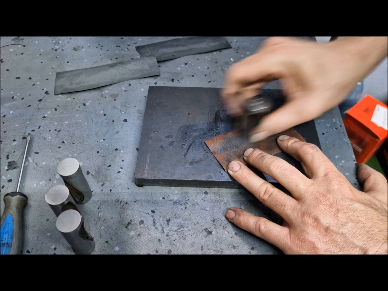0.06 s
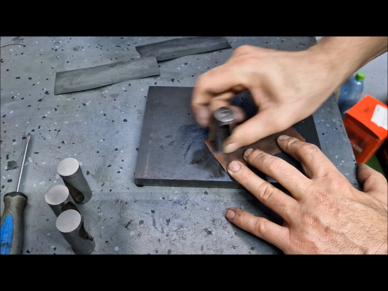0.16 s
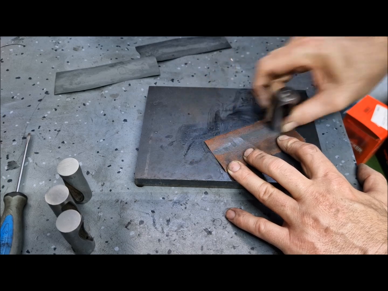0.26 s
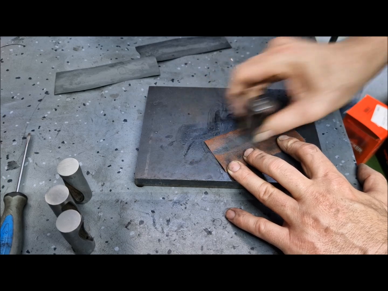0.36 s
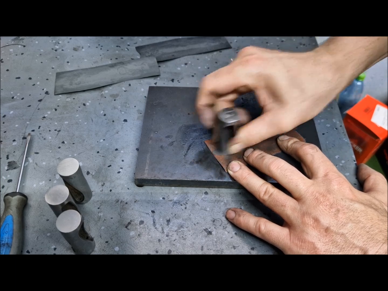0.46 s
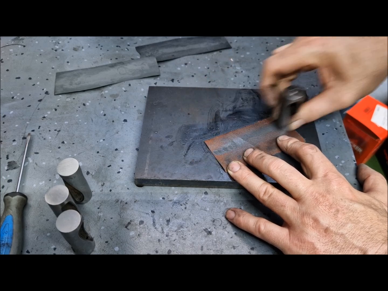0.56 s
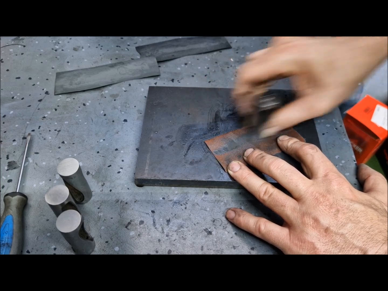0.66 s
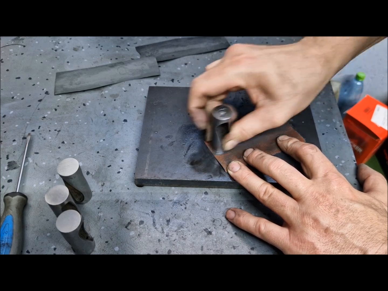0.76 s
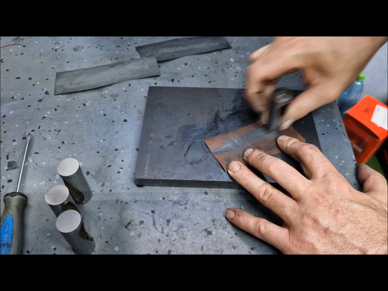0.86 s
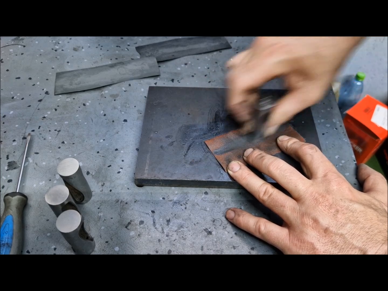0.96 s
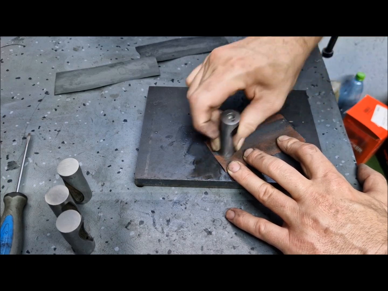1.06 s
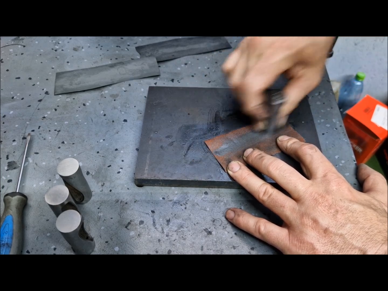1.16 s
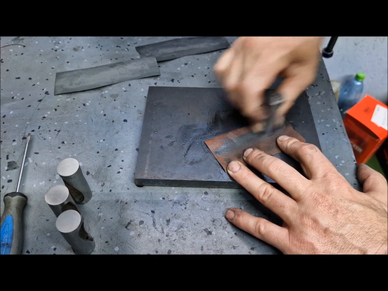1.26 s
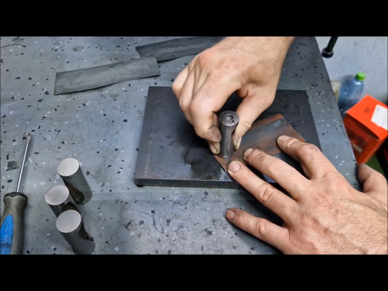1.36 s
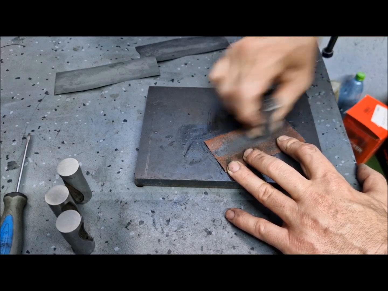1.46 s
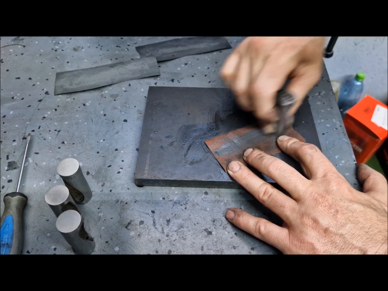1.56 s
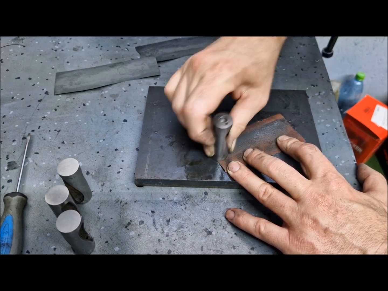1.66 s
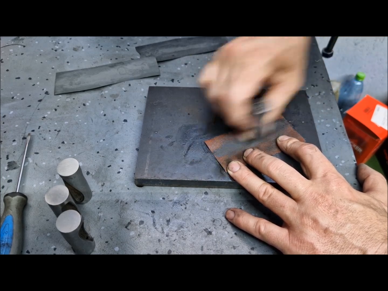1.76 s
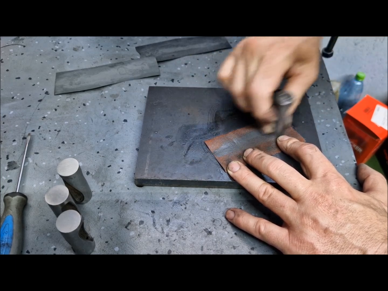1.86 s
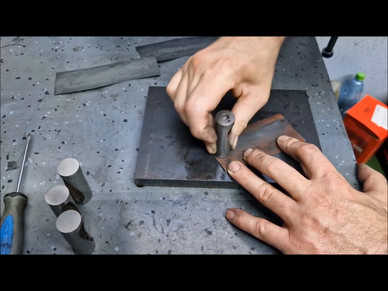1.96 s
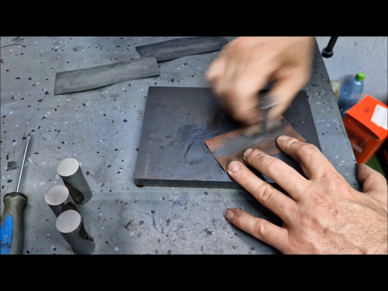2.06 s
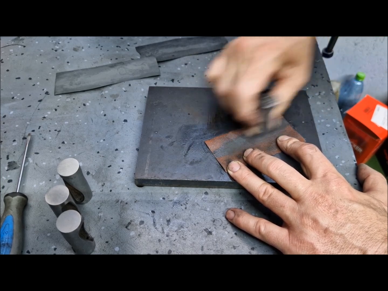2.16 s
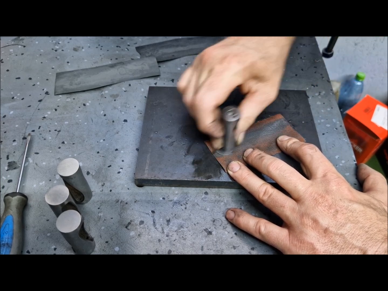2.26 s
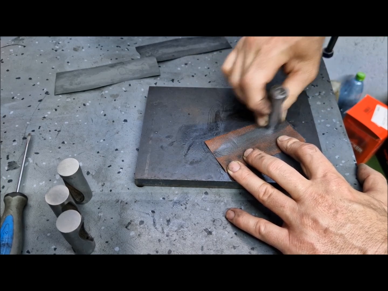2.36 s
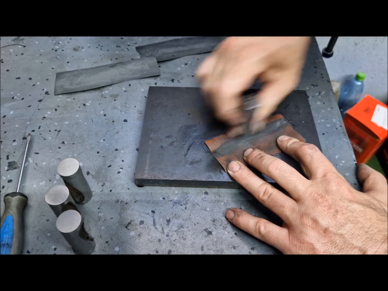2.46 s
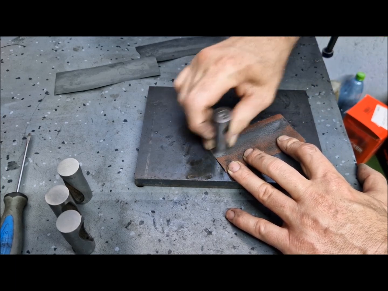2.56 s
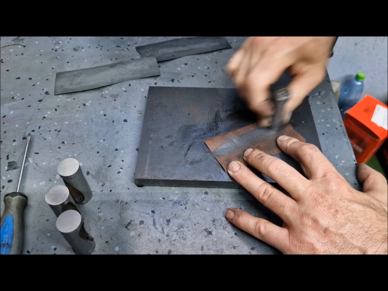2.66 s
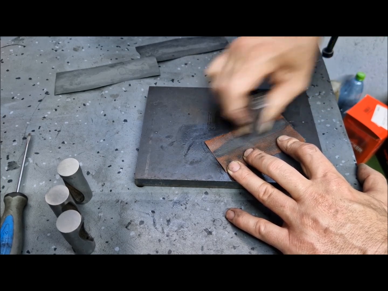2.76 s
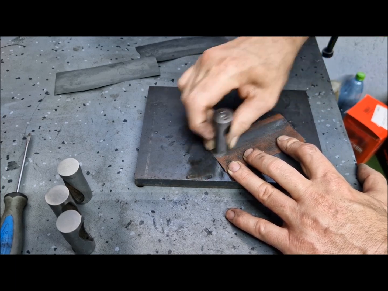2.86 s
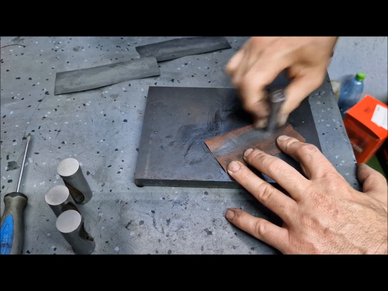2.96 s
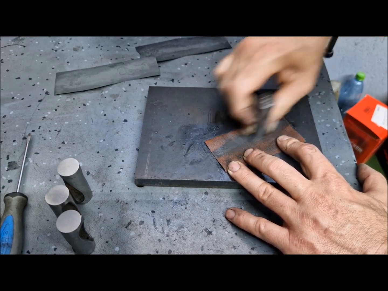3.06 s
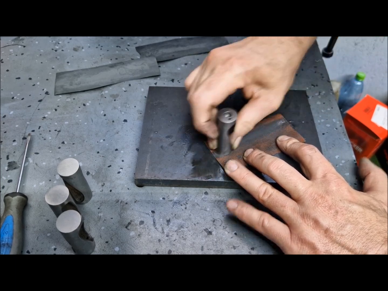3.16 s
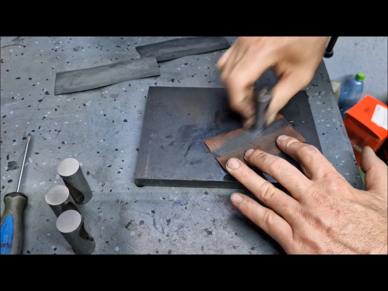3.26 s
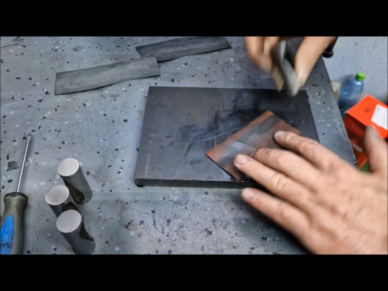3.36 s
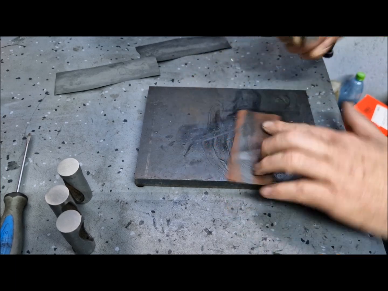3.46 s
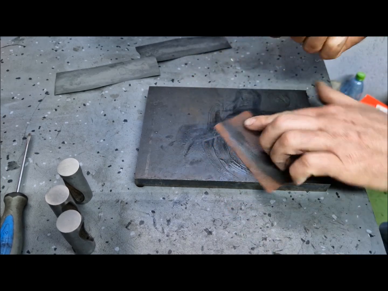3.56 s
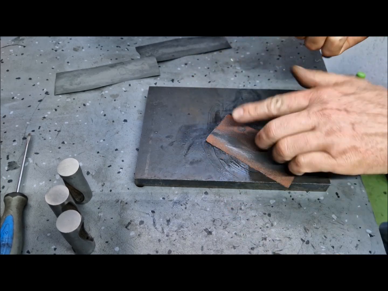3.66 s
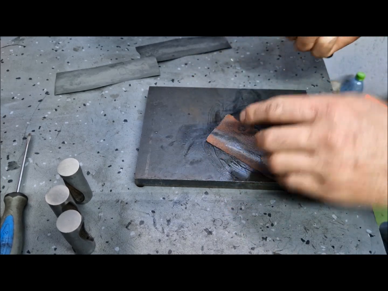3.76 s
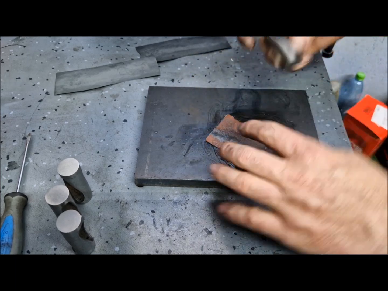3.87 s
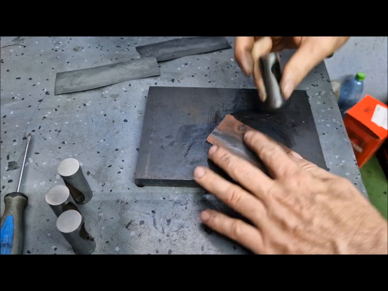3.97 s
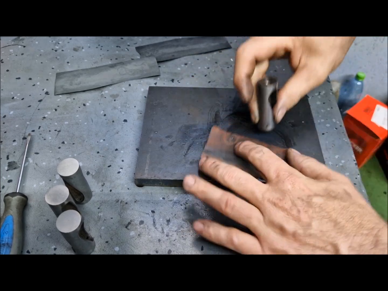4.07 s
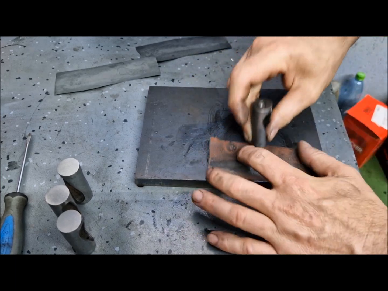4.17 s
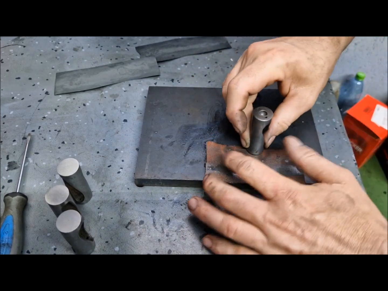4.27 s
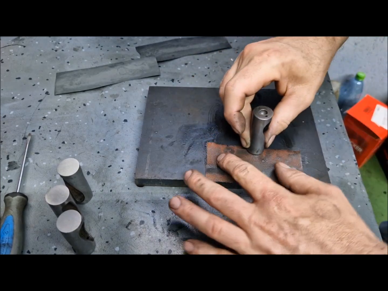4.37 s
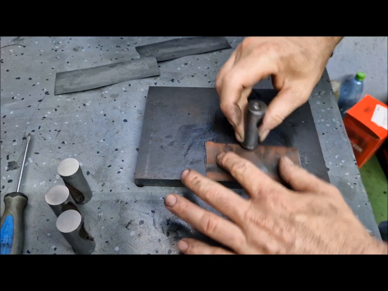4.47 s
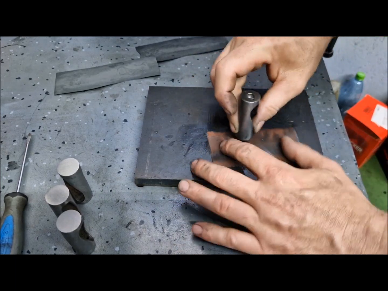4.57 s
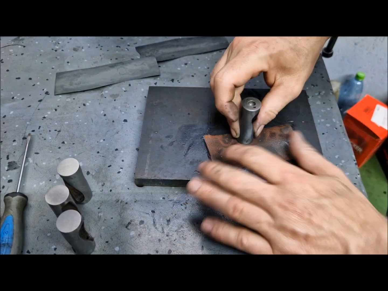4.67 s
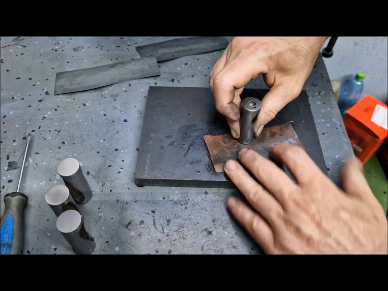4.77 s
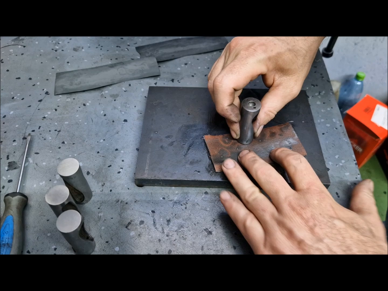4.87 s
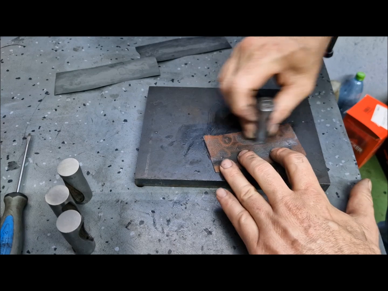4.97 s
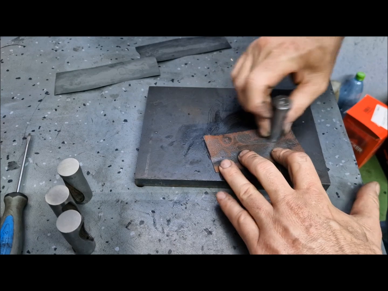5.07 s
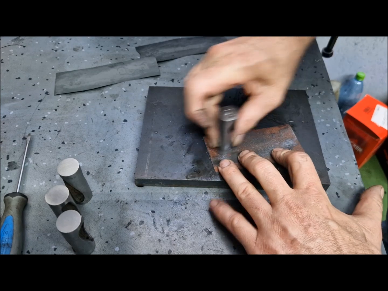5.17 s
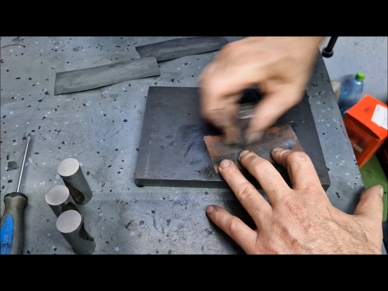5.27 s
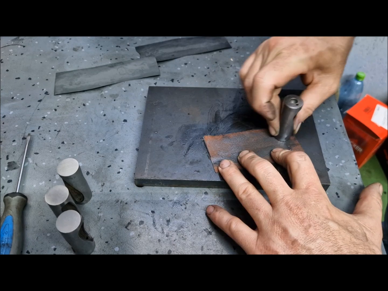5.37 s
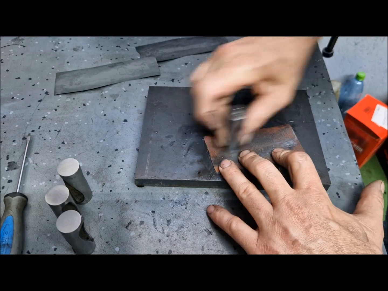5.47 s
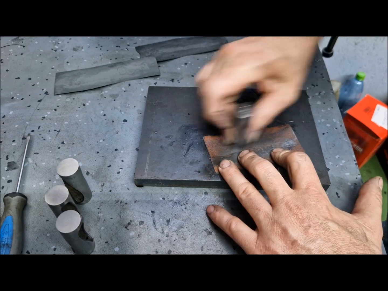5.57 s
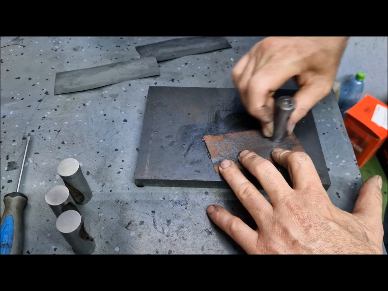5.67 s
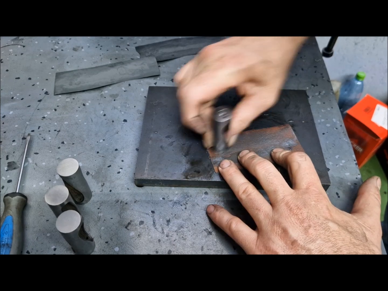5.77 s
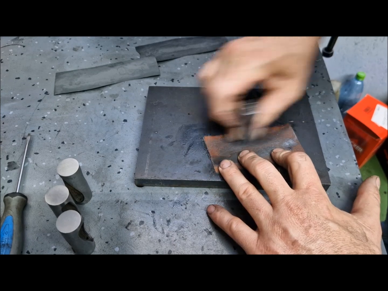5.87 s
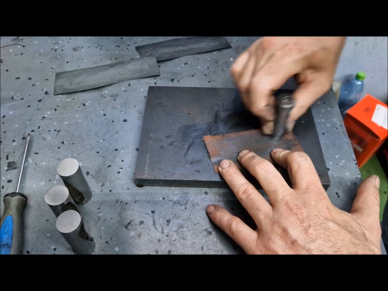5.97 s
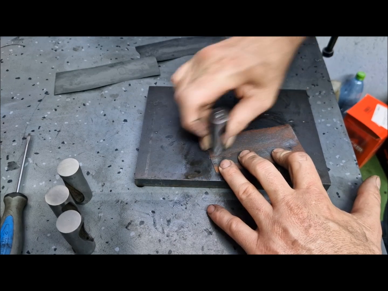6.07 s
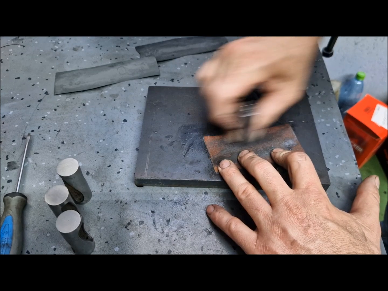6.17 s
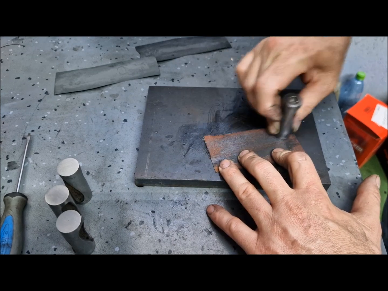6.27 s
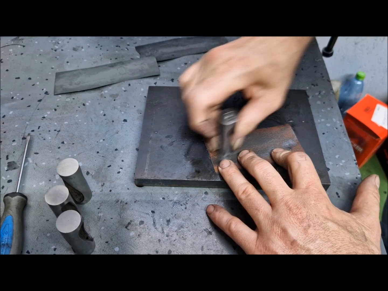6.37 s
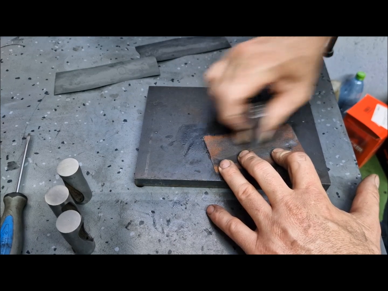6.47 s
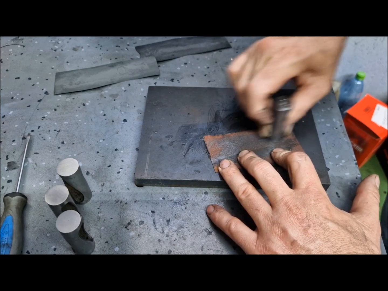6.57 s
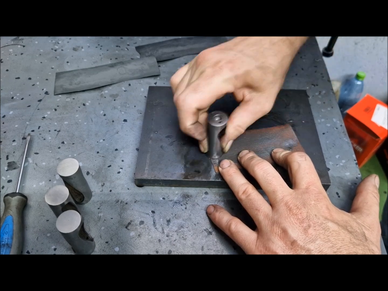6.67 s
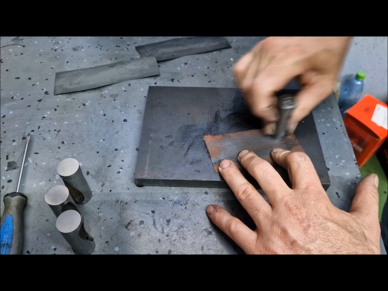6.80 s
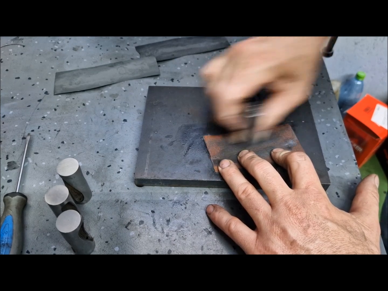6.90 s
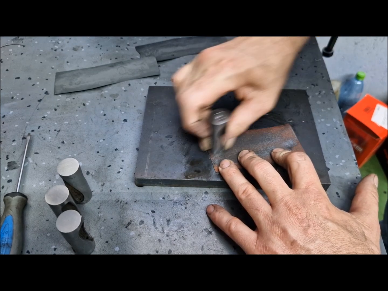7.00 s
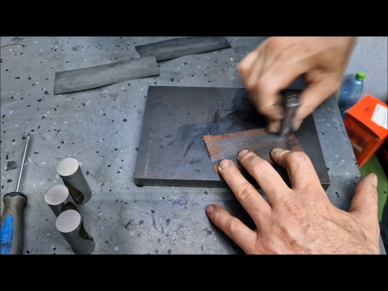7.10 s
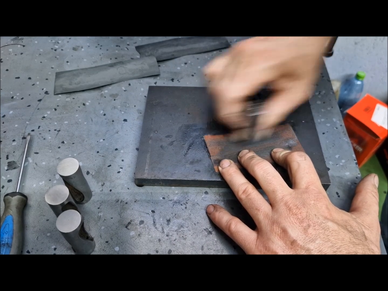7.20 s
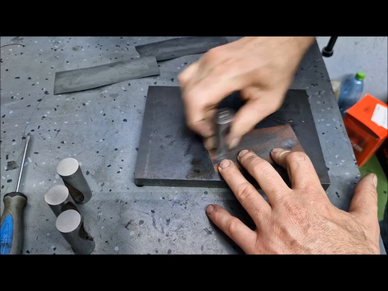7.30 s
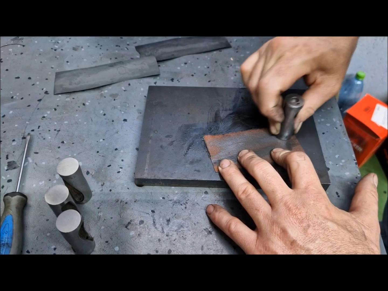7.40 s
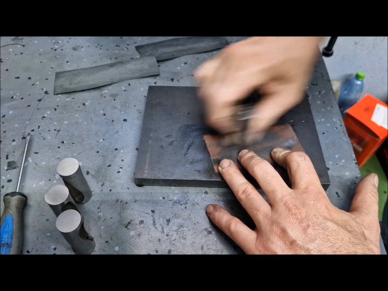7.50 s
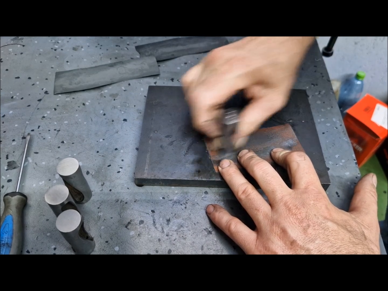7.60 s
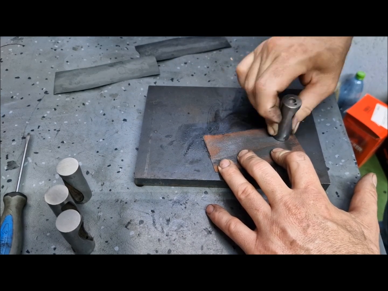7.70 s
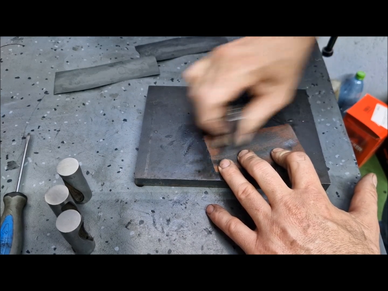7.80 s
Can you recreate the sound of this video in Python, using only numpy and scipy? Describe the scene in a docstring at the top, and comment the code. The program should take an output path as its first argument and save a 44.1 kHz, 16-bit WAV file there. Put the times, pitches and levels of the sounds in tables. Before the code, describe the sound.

Close stereo view of hand lapping at a workshop bench: a steel engine part rasps on sandpaper in six or seven bright, hissing strokes a second, with short squeaky chirps and soft low bumps at turns. Midway it stops, the paper slides and crackles, a sharp clink and a duller knock ring the steel plate, then similar, less squeaky rubbing resumes. Short room echo, low faint drone.

```python
"""Hand lapping: a steel engine part is rubbed on sandpaper over a steel plate, six or seven strokes a second.
Dense noise grains hiss and rasp with hand speed; friction noise drives ringing steel modes and the bench.
Turns nudge the bench; chirped stick-slip bursts are the edge catching, strongest in the first spell.
Midway the paper slides to a fresh spot (shaped noise), the part is set down with a clink, the plate knocks
(noise clacks and ringing modes), and lapping goes on. A short echo and a low room drone surround it all."""
import sys
import numpy as np
from scipy import signal
from scipy.fft import rfft, irfft, next_fast_len
from scipy.io import wavfile
from scipy.ndimage import uniform_filter1d, map_coordinates

SR = 44100
rng = np.random.default_rng(int(sys.argv[2]) if len(sys.argv) > 2 else 0)


def master(y):
    """Save y as 16-bit WAV."""
    cut = np.clip(np.atleast_2d(y).T, -1, 1)
    pcm = np.round(cut * 32767)  # scale
    wavfile.write(sys.argv[1], SR, pcm.astype(np.int16))


N = 345744
TIME = np.arange(N) / SR  # s
SIZE = next_fast_len(N + SR, True)  # FFT length, samples
FREQ = np.maximum(np.arange(SIZE // 2 + 1) * SR / SIZE, 1)  # Hz


def undb(db):
    """Decibels to gain."""
    return 10 ** (np.asarray(db) / 20)


def unit(x):
    """Scale to rms 1."""
    return x / np.sqrt(np.mean(x ** 2))


def contour(points):
    """Join (Hz, value) points on a log-frequency axis."""
    hz, value = np.transpose(points)
    return np.interp(np.log(FREQ), np.log(hz), value)


def colour(x, points):
    """Causal minimum-phase filter with the given spectrum, built by folding the cepstrum."""
    cepstrum = irfft(np.log(undb(contour(points))), SIZE)
    cepstrum[1:SIZE // 2] *= 2
    cepstrum[SIZE // 2 + 1:] = 0
    response = np.exp(rfft(cepstrum))
    return irfft(rfft(x, SIZE) * response, SIZE)[..., :N]


# left-right correlation: [freq_hz, correlation]
LIKENESS_BY_HZ = [(60, 0.94), (300, 0.88), (700, 0.14), (1300, 0), (2200, 0.44), (5500, 0.43), (7500, 0),
                  (10000, -.1), (15000, -.1)]


def spread(pair, left_db):
    """Two unrelated signals become left and right, alike in the bass."""
    alike = np.clip(contour(LIKENESS_BY_HZ), -.99, .99)
    weights = np.sqrt([1 + alike, 1 - alike])
    mid, side = irfft(rfft(pair, SIZE) * weights, SIZE)[:, :N]
    return np.array([mid + side, mid - side]) * undb([[left_db / 2], [-left_db / 2]])


def walk(rate):
    """Random wander of rms 1: straight lines between `rate` random knots a second."""
    knots = rng.standard_normal(N // 20)
    return unit(np.interp(TIME * rate, np.arange(len(knots)), knots))


def band(x, hz, width_hz):
    """One broad resonance."""
    b, a = signal.iirpeak(hz, hz / width_hz, SR)
    return signal.lfilter(b, a, x)


def soften(x, hz):
    """A softer, longer contact loses the treble: second-order low-pass."""
    return signal.sosfilt(signal.butter(2, hz, fs=SR, output="sos"), x)


def fade(t60):
    """One second of exponential decay, 60 dB down after t60 seconds."""
    return undb(-60 * TIME[:SR] / t60)


def ring(modes, phase_spread):
    """Sum of decaying sine modes; each reaches the two ears with its own phase (spread in rad)."""
    ears = np.array([[1], [-1]])
    out = np.zeros((2, SR))
    for k, (hz, db, t60) in enumerate(modes):
        phase = 2 * np.pi * hz * TIME[:SR] + phase_spread * (-1) ** k * ears / 2
        out += undb(db) * fade(t60) * np.sin(phase)
    return out


def through(x, response):
    """Convolve a signal with an impulse response: a force with a ringing body, a sound with an echo."""
    return signal.fftconvolve(np.atleast_2d(x), response, axes=1)[:, :N]


def add(out, s, sound):
    """Mix a sound in at time s."""
    start = min(max(int(s * SR), 0), N)
    out[:, start:start + sound.shape[1]] += sound[:, :N - start]


def grit(size_db, clump_db, clump_rate):
    """Dense micro-impacts of uneven size, bunched as the grains grip and let go."""
    level_db = size_db * rng.standard_normal(N) + clump_db * walk(clump_rate)
    return unit(rng.standard_normal((2, N)) * undb(level_db))


# two spells of lapping, even tempo between points; odd strokes pull, even push: [start_s, stroke_number]
LAPPING_SPELLS = [
    [(-.125, 1), (.471, 5), (1.08, 9), (1.71, 13), (2.453, 18), (3.214, 23), (3.385, 24)],
    [(4.938, 1), (5.42, 4), (5.852, 7), (6.309, 10), (6.736, 13), (7.182, 16), (7.91, 21)],
]


def turns():
    """Start time, length and number of every stroke."""
    rows = []
    for spell in LAPPING_SPELLS:
        s, number = np.transpose(spell)
        numbers = np.arange(number[0], number[-1] + 1)
        starts = np.interp(numbers, number, s)
        rows += zip(starts, np.diff(starts), numbers)
    return rows


# how the hand bears on the part, levels relative: [time_s, hiss_db, rasp_re_hiss_db, ring_re_hiss_db,
# drag_db, bench_press_db, top_speed_share (moment of top speed, 0-1 of a mean stroke)]
HAND_GRIP = [(0.3, -37, -2, -11.5, -53, -49.5, .5), (1.55, -37.5, -2, -16.5, -54, -55, 0.51),
             (2.2, -37.5, -2.1, -16.5, -49.5, -49.5, .48), (3.3, -39, -1.7, -11.5, -51.5, -52.5, 0.49),
             (5.02, -41, -2.5, -21, -59, -69, 0.53), (5.18, -38, -2.5, -12.5, -54.5, -67, 0.52),
             (5.34, -38, -4.5, -13.5, -53.5, -56.5, 0.53), (6.1, -37, -4.5, -17, -50, -48, 0.51),
             (7.75, -38.5, -4.2, -16.5, -51.5, -48, 0.54)]
# a push rasps more and peaks later than the mean stroke, a pull less and earlier by as much
PUSH_RASP_DB, PUSH_LATE_SHARE, STROKE_SCATTER_DB = 0.4, 0.025, .5


def hand():
    """Speed (zero at every turn), contact, and the levels of the running stroke."""
    s, *columns = np.transpose(HAND_GRIP)
    hiss_db, rasp_db, ring_db, drag_db, press_db, top = (np.interp(TIME, s, c) for c in columns)
    speed, contact, way, force = np.zeros((4, N))
    for start, length, number in turns():
        now = slice(*np.searchsorted(TIME, [start, start + length]))
        contact[now] = 1
        way[now] = (-1) ** number  # push +1, pull -1
        force[now] = rng.standard_normal()
        peak = np.clip(top[now.start] + PUSH_LATE_SHARE * (-1) ** number, .1, .9)
        progress = (TIME[now] - start) / length
        speed[now] = np.sin(np.pi * np.interp(progress, [0, peak, 1], [0, .5, 1]))
    contact, way, force = uniform_filter1d([contact, way, force], SR // 30)
    hiss_db = hiss_db + STROKE_SCATTER_DB * force
    rasp_db = rasp_db + PUSH_RASP_DB * way
    return speed, contact.clip(0), hiss_db, rasp_db, ring_db, drag_db, press_db


def patchy(x, depth_db, rate, count):
    """The contact patch keeps shifting, so each stretch of the spectrum swells and fades on its own."""
    edges_hz = np.geomspace(350, 16000, count)
    spectrum = rfft(x, SIZE)
    out = np.zeros((2, N))
    for row in np.eye(count):
        share = np.interp(FREQ, edges_hz, row)
        out += irfft(spectrum * share, SIZE)[:, :N] * undb(depth_db * walk(rate))
    return unit(out)


def off_the_hand(x, share, lag_s, sway):
    """A reflection from the moving hand combs the sound with notches that wander."""
    late = []
    for ear in x:
        lag = lag_s * np.exp(sway * walk(9))
        late.append(map_coordinates(ear, [(TIME - lag) * SR], order=3))
    return (x + share * np.array(late)) / np.hypot(1, share)


# relative spectra of grit hiss, edge rasp and drag on the backing: [freq_hz, level_db]
HISS_SPECTRUM = [(700, -46.5), (1600, -21.5), (2200, -13), (2800, -11), (3800, -7.5), (4400, -9),
                 (6000, -8.5), (8300, 1), (10500, 2.5), (13000, 3.5), (16000, 1.5)]
RASP_SPECTRUM = [(1000, -56), (3000, -18.5), (3700, -14), (4400, -11.5), (4850, -2.5), (5150, -6),
                 (5550, 0), (6300, -4), (7000, -6.5), (7400, -1.5), (8300, -23.5), (14000, -33)]
SCUFF_SPECTRUM = [(300, -16), (540, 3.5), (700, -9), (1000, -4.5), (1100, -15), (1420, 4.5), (1600, -12),
                  (2050, 9), (2600, 0), (4000, -16)]
# modes of the steel plate before hand damping, also rung by the knocks: [freq_hz, level_db, t60_s]
PLATE_MODES = [(1715, -26, .15), (1943, -22, .65), (1967, -11, .22), (1994, -13, .15), (2150, -24, .14),
               (3517, -27, .2), (3876, -7.5, .17), (3957, -13, .13), (4026, -1.5, .12), (4080, -20, .24)]


def lapping(speed, contact, hiss_db, rasp_db, ring_db, drag_db):
    """Faster sliding cuts more grains and sounds brighter; grit friction also rings the steel."""
    # the hand loops a little, so it never quite stops
    pace = (speed + 0.23 * contact) * undb(.5 * walk(45))

    cut = colour(spread(grit(size_db=-0.5, clump_db=1.2, clump_rate=700), left_db=.8), HISS_SPECTRUM)
    cut = patchy(cut, depth_db=1.5, rate=40, count=12)
    bright = pace ** 1.67 * cut
    dull = 2.6 * (contact - speed) * pace ** 2.35 * soften(cut, hz=3500)
    hiss = undb(hiss_db + 5.0) * (bright + dull)

    scrape = spread(grit(size_db=5.5, clump_db=2, clump_rate=300), left_db=-0.9)
    scrape = unit(colour(scrape, RASP_SPECTRUM))
    rasp = undb(hiss_db + rasp_db + 2.3 * walk(60)) * pace ** 2.25 * scrape

    # the flat face drags on the paper's backing with a dull, patchy scuff
    drag = colour(spread(grit(size_db=2, clump_db=1.5, clump_rate=53), left_db=0.5), SCUFF_SPECTRUM)
    drag = patchy(drag, depth_db=4, rate=25, count=12)
    scuff = undb(drag_db - 4.5) * pace ** 0.76 * drag
    rubbing = off_the_hand(hiss + rasp + scuff, share=.45, lag_s=.0009, sway=.35)

    # the gripping hand damps the steel
    steel = ring(PLATE_MODES, phase_spread=.9) * fade(t60=.16)
    steel = steel / np.sqrt(np.sum(steel[0] ** 2))
    friction = soften(grit(size_db=2.5, clump_db=3.5, clump_rate=91)[0], hz=2270)
    force = undb(hiss_db + ring_db) * pace ** .5 * friction
    ringing = undb(2.5) * through(force, steel)

    # slow sliding near the turns makes it sing in short, rough spurts
    spurts = spread(grit(size_db=3, clump_db=5, clump_rate=30), left_db=0)
    spurts = unit(band(spurts, hz=4060, width_hz=110))
    sing = undb(hiss_db - 15.5) * pace ** .5 * (contact - 0.47 * speed) * spurts
    return rubbing + sing + ringing


# turns nudge the bench, the part rocks once a stroke; levels relative, Hz are medians
TURN_DB, TURN_HZ, ROCK_DB, ROCK_HZ = -14.5, 89.6, -22.5, 270
BUMP_SCATTER_DB, BUMP_SCATTER_OCTAVES = 2.5, .35


def nudges():
    """Soft thud as the hand reverses, lighter bump as the part rocks: (start_s, level_db, centre_hz)."""
    rows = []
    for start, length, number in turns():
        if number <= 2:  # the first strokes of a spell are too light to shake the bench
            continue
        turn = (start, TURN_DB, TURN_HZ)
        rock = (start + length * rng.uniform(), ROCK_DB, ROCK_HZ)
        for s, db, hz in (turn, rock):
            size, pitch = rng.standard_normal(2)
            rows.append((s, db + BUMP_SCATTER_DB * size, hz * 2 ** (BUMP_SCATTER_OCTAVES * pitch)))
    return rows


# relative spectrum of the friction-shaken bench: [freq_hz, level_db]
RUMBLE_SPECTRUM = [(15, -23.5), (30, -8.5), (56, 5.5), (100, -6.5), (128, -6), (170, -11), (225, -10),
                   (250, -2.5), (300, -17.5), (350, -26.5), (420, -18), (480, -33), (700, -27.5),
                   (1300, -60.5)]
# modes of the bench: [freq_hz, level_db, t60_s]
BENCH_MODES = [(54.4, -7.5, 0.7), (84, -0.5, 0.13), (132.2, -2, 0.17), (199, -3.5, .12), (250, -12.5, 0.24),
               (321.4, -5.5, 0.091), (360, -8.5, 0.09), (531, -13, .12), (723, -12.5, 0.28)]
# harder bumps on the bench, levels relative: [start_s, level_db, centre_hz]
BENCH_THUDS = [(3.339, -12, 250), (4.235, 1, 332), (4.378, -11.5, 142), (4.694, -0.5, 92), (4.695, 2, 326),
               (5.245, -10, 152), (5.82, 0.5, 122), (6.13, -10.5, 132), (6.995, -8, 109)]


def bench(speed, contact, press_db):
    """Friction shakes the bench all through a stroke; shoves and knocks ring its low modes."""
    shake = spread(grit(size_db=2.5, clump_db=3.5, clump_rate=55), left_db=1.2)
    shake = unit(colour(shake, RUMBLE_SPECTRUM))
    out = undb(press_db - 0.5) * shake * (contact + 0.034 * speed)
    body = ring(BENCH_MODES, phase_spread=.25) * undb([[.8], [-.8]])
    for s, db, hz in BENCH_THUDS + nudges():
        thud = soften(band(body, hz, width_hz=hz * 0.66), 2 * hz)
        add(out, s, undb(db - 27.0) * thud)
    return out


# relative spectrum of the room's drone: [freq_hz, level_db]
ROOM_SPECTRUM = [(12, -35), (25, -2), (54, -5.5), (110, -13), (170, -20.5), (270, -22.5), (400, -35.5),
                 (800, -40), (2800, -46), (6000, -41), (16000, -51)]


def workshop(dry):
    """A short diffuse echo, poor in bass and treble, and the low drone of the room."""
    echo = rng.standard_normal((2, SR)) * fade(t60=0.3) * (TIME[:SR] > .004)
    echo = band(echo / np.sqrt(np.sum(echo[0] ** 2)), hz=2070, width_hz=17000)
    echo = soften(echo, hz=7500)
    echo = signal.sosfilt(signal.butter(1, 250, "high", fs=SR, output="sos"), echo)
    drone = unit(colour(spread(rng.standard_normal((2, N)), left_db=3.5), ROOM_SPECTRUM))
    drone = drone * undb(0.84 * walk(4.2))
    return dry + undb(-8.5) * through(dry, echo) + undb(-59.5) * drone


# a coarse grain snags the edge lightly; level relative
SNAG_DB, SNAG_SCATTER_DB, SNAG_HZ, SNAG_S = -32.5, 1.5, 5610, 0.0027


def snags():
    """Light catches, one at a chance moment of each push: (centre_s, level_db, pitch_hz, length_s)."""
    rows = []
    for start, length, number in turns():
        if number % 2 == 0:
            s = start + length * rng.uniform(1 / 5, 2 / 3)
            db = SNAG_DB + SNAG_SCATTER_DB * rng.standard_normal()
            rows.append((s, db, SNAG_HZ, SNAG_S))
    return rows


# the edge catches on the grit and chatters, levels relative, pitch at mid-chirp, length a mean decay scale:
# [centre_s, level_db, pitch_hz, length_s]
EDGE_CATCHES = [(0.085, -37, 5770, 0.01), (0.389, -24.5, 5590, 0.0089), (0.699, -23, 5600, 0.0067),
                (0.985, -31, 5080, 0.0068), (1.314, -22, 5650, 0.0046), (1.624, -24, 5710, 0.0081),
                (1.921, -26, 5390, 0.0056), (2.211, -28.5, 5280, 0.0065), (2.234, -19.5, 5024, 0.0044),
                (2.516, -20, 5600, 0.0028), (2.793, -29, 5660, 0.0036), (2.824, -20.5, 5480, 0.0016),
                (3.131, -21.5, 5570, 0.0046), (3.34, -29, 5460, 0.0064)]


def catches():
    """A short run of stick-slip jerks; the pitch shoots up as the edge breaks free."""
    out = np.zeros((2, N))
    t = TIME[:SR // 10] - 1 / 20
    for s, db, hz, length in EDGE_CATCHES + snags():
        jerks = unit(soften(rng.standard_normal((3, len(t))), hz=730))
        side_s = length * np.where(t < 0, .8, 1.2)  # rises faster than it falls
        swell = np.exp(-np.abs(t / side_s) ** 0.79)
        phase = 2 * np.pi * np.cumsum(hz * (1 + .1 * np.tanh(t / 0.00592))) / SR
        chatter = swell * ((0.51 + 0.75 * jerks[0]) * np.sin(phase) + 0.4 * jerks[1:] * np.cos(phase))
        # the skid sweeps from one to two times the pitch
        phase = 2 * np.pi * np.cumsum(hz * (1.5 + .5 * np.tanh((t - .004) / 0.00392))) / SR
        rough = unit(soften(rng.standard_normal((2, len(t))), hz=1500))
        skid = rough * np.sin(phase) * np.exp(-((t - .006) / 0.0041) ** 2)
        add(out, s - 1 / 20, undb(db + 1.5) * (chatter + undb(-5.5) * skid))
    return out


# a slide starts and stops quickly, swells, holds or dips slightly midway, and the sheet settles afterwards
SLIDE_EDGE_S, SETTLE_DB, SETTLE_DB_PER_S = 0.0086, -18, 170


def sliding(start, length, db, middle_db):
    """Gain of one slide: quick edges, a swell, hold or slight dip midway, then a faint settling tail."""
    outside_s = np.maximum(start - TIME, TIME - start - length).clip(0, 1)
    progress = np.clip((TIME - start) / length, 0, 1)
    shape = undb(middle_db * (np.sin(np.pi * progress) - 1))
    settle = (TIME > start + length) * undb(SETTLE_DB - SETTLE_DB_PER_S * outside_s)
    return undb(db) * shape * (np.exp(-outside_s / SLIDE_EDGE_S) + settle)


# relative spectrum of paper sliding on the plate: [freq_hz, level_db]
PAPER_SPECTRUM = [(200, -17), (600, -21), (1050, -18), (1480, -11), (1900, -11), (2500, -12.5), (3600, -5),
                  (5500, -1), (8000, -2), (12000, 1), (15500, 2.5)]
# paper slides over the plate, levels relative: [start_s, length_s, level_db, middle_re_ends_db]
PAPER_SLIDES = [(3.383, .1, -50.5, -1), (3.484, .13, -39.5, 5), (3.613, 0.095, -45.5, 0),
                (4.057, 0.18, -49, 5), (4.26, .075, -59, 3), (4.39, 0.054, -57, 2), (4.471, 0.22, -43.5, 7)]
# paper and fingertips swish: [centre_s, level_db, centre_hz, length_s]
FINGER_SWISHES = [(4.096, -43.5, 5460, 0.034), (4.18, -66, 1300, .03), (4.479, -46, 5760, 0.019),
                  (4.538, -59, 1380, 0.057), (5.03, -60, 1270, .03), (5.229, -49, 1990, 0.023)]
# paper crackles under the fingers, levels relative: [start_s, level_db, centre_hz]
PAPER_CRACKLES = [(3.356, -37.5, 1410), (4.019, -46.5, 3050), (4.052, -45.5, 5450), (4.387, -43, 6100),
                  (4.409, -42, 4340), (4.690, -35.5, 5200), (4.8, -47, 7000), (4.812, -40, 5400),
                  (4.911, -52, 11100), (4.955, -41, 8250)]


def paper():
    """The sheet's back slides on the plate, duller as it slows; it swishes and crackles under the fingers."""
    gain = np.max([sliding(*slide) for slide in PAPER_SLIDES], axis=0)
    rub = colour(spread(grit(size_db=0, clump_db=1.1, clump_rate=700), left_db=.5), PAPER_SPECTRUM)
    rub = patchy(rub, depth_db=1.8, rate=18, count=8)
    out = undb(7.5) * gain * rub + undb(-41) * gain ** .5 * soften(rub, hz=7000)
    half = SR // 2  # samples in half a second
    for s, db, hz, length in FINGER_SWISHES:
        common, *own = rng.standard_normal((3, half))
        swish = common + 0.81 * np.array(own)
        for _ in range(2):
            swish = band(swish, hz, width_hz=hz * 0.42)
        swell = np.exp(-((TIME[:half] - 1 / 4) / length) ** 2)
        add(out, s - 1 / 4, undb(db) * swell * unit(swish))
    for s, db, hz in PAPER_CRACKLES:
        common, *own = rng.standard_normal((3, half))
        burst = (common + 1.6 * np.array(own)) * fade(t60=0.022)[:half]
        crackle = band(band(burst, hz, width_hz=hz * 0.44), hz, width_hz=hz * 1.6)
        add(out, s, undb(db + 7) * crackle)
    return out


# relative spectrum of the hard clack: [freq_hz, level_db]
CLACK_SPECTRUM = [(100, -9), (400, -5), (800, -15), (1300, -8), (1550, -7), (2500, -4.5), (4300, -2.5),
                  (5700, 1), (6500, -11), (8400, -10), (10200, 2), (15000, -11)]
# modes of the engine part: [freq_hz, level_db, t60_s]
PART_MODES = [(4860, -11, .11), (5455, -19, .09), (5545, -10, .23), (6259, -30, .1), (7390, -27, .1),
              (7775, -12, .15), (9345, -20, .1), (10740, 6, .032)]
# steel meets steel, levels relative, corner is the clack's: [start_s, level_db, corner_hz, part_ring_db]
STEEL_KNOCKS = [(4.235, 0, 7450, -1.5), (4.385, -25, 5000, 6), (4.696, 1, 1500, -14),
                (4.799, -28, 3000, -4)]


def knocks():
    """A hard clack; plate and part ring loudly for a moment, then fade on more slowly."""
    rings, clack = np.zeros((2, 2, N))
    for s, db, hz, part_db in STEEL_KNOCKS:
        plate = ring(PLATE_MODES, phase_spread=1.0)
        part = undb(part_db) * ring(PART_MODES, phase_spread=0.85)
        steel = (plate + part) * (1 + 1.5 * fade(t60=.065))
        add(rings, s, undb(db - 24.5) * soften(soften(steel, 1.42 * hz), 1.42 * hz))
        burst = rng.standard_normal((2, SR)) * (fade(t60=0.047) + undb(-22.0) * fade(t60=0.69))
        add(clack, s, undb(db - 16) * soften(burst, hz))
    return rings * undb([[-1], [1]]) + colour(spread(clack, left_db=1.5), CLACK_SPECTRUM)


def scene():
    """All sources on the bench, heard in the workshop."""
    speed, contact, hiss_db, rasp_db, ring_db, drag_db, press_db = hand()
    strokes = lapping(speed, contact, hiss_db, rasp_db, ring_db, drag_db)
    shaking = bench(speed, contact, press_db)
    return workshop(strokes + shaking + catches() + paper() + knocks())


TOP_HZ = 15800


def record(dry):
    """Steep elliptic low-pass: nothing much is left above TOP_HZ."""
    return signal.sosfilt(signal.ellip(12, .1, 80, TOP_HZ, fs=SR, output="sos"), dry)


dry = scene()
out = record(dry)
master(out)
```